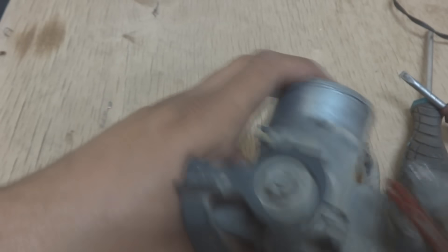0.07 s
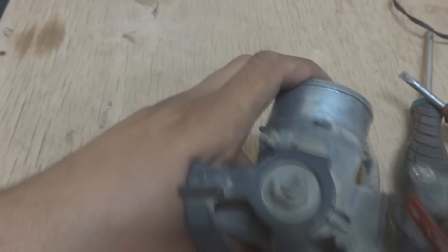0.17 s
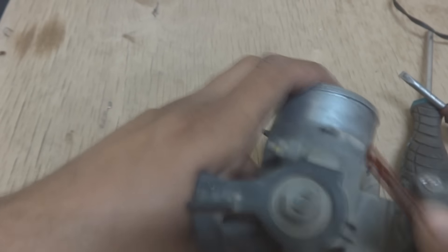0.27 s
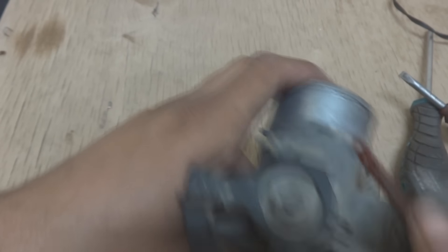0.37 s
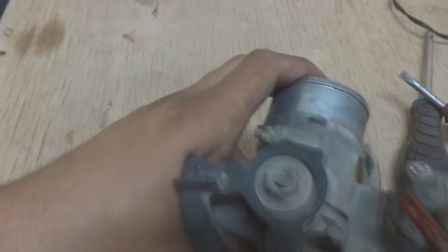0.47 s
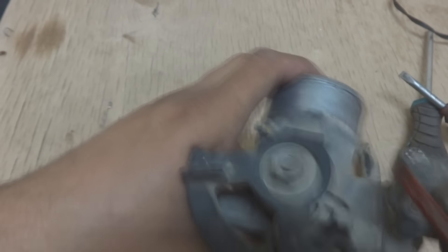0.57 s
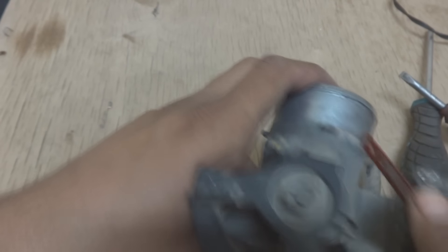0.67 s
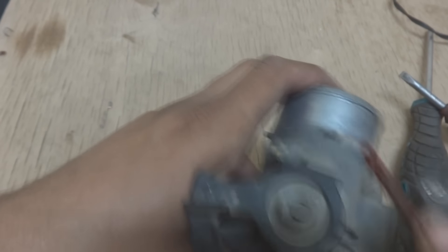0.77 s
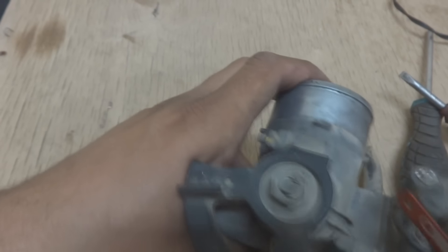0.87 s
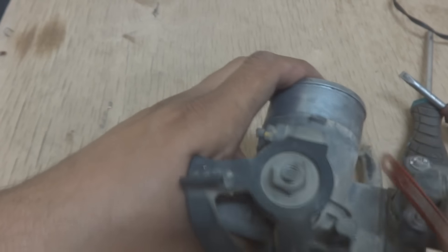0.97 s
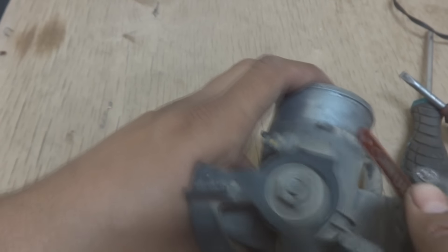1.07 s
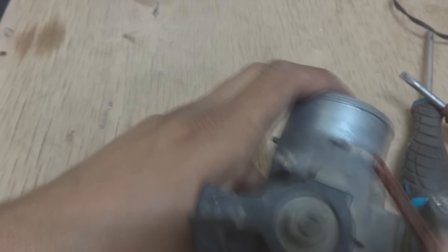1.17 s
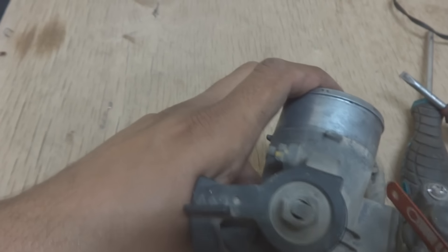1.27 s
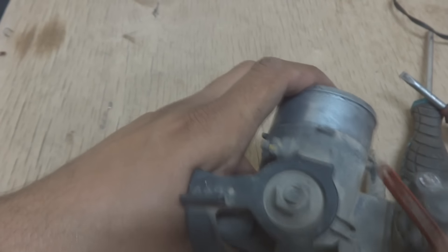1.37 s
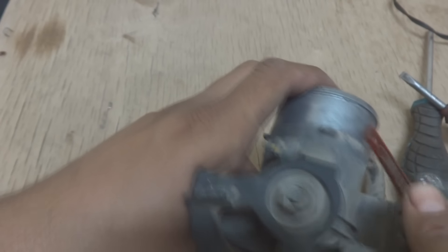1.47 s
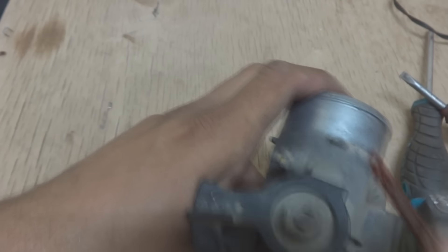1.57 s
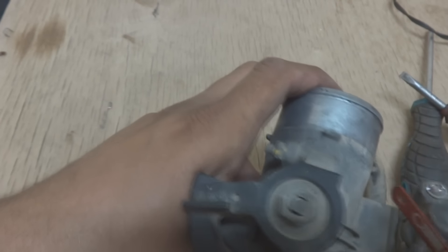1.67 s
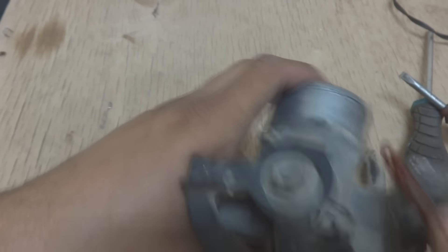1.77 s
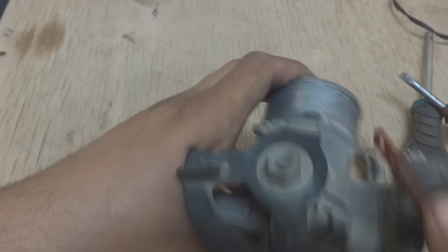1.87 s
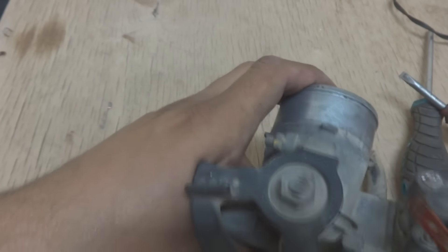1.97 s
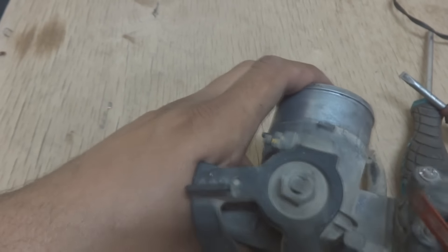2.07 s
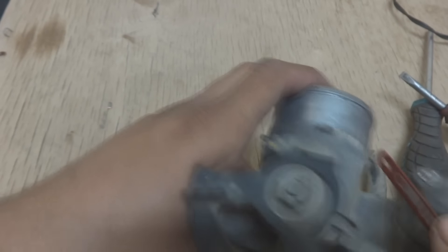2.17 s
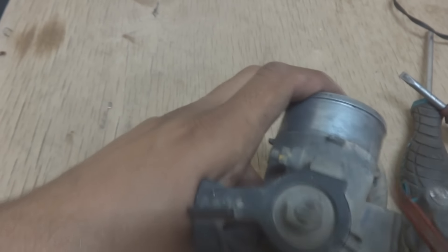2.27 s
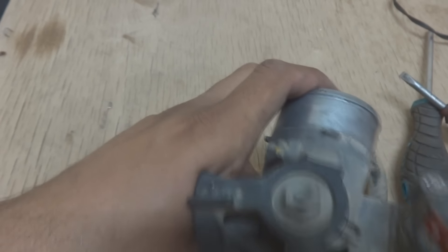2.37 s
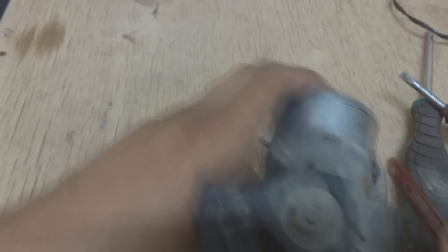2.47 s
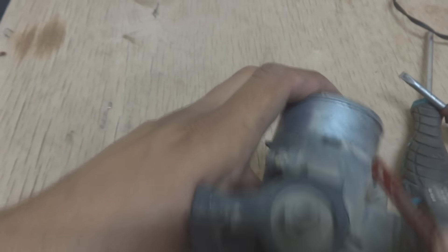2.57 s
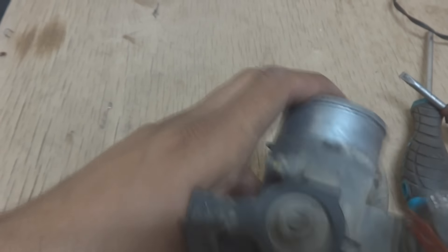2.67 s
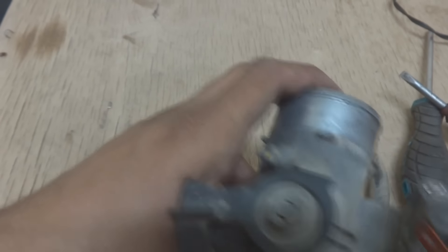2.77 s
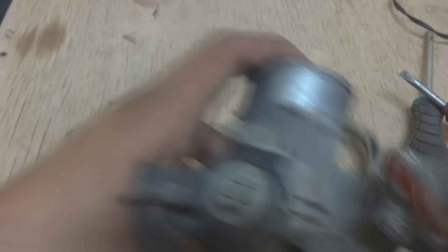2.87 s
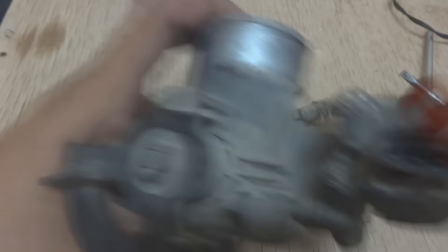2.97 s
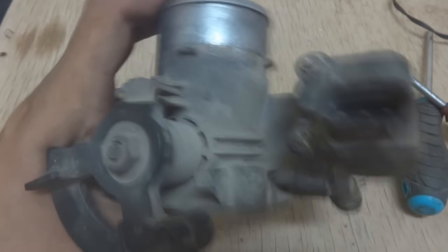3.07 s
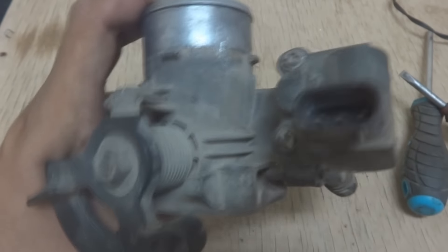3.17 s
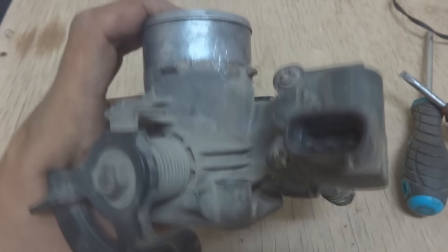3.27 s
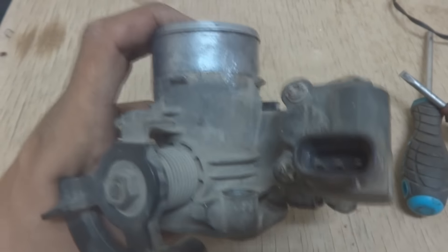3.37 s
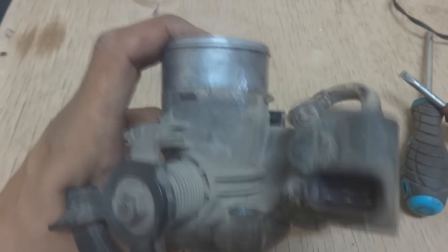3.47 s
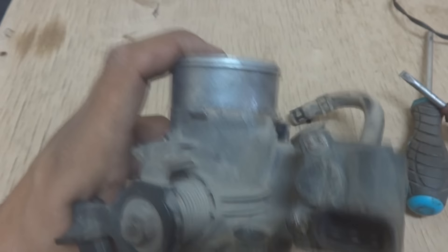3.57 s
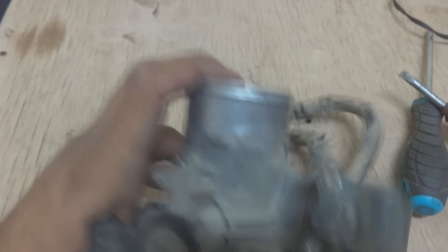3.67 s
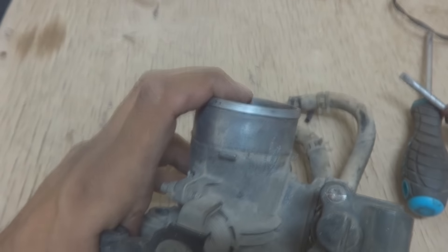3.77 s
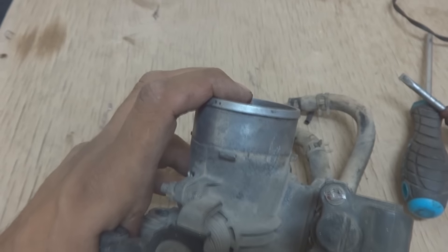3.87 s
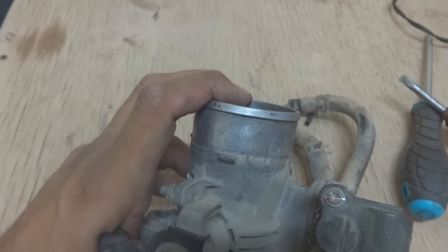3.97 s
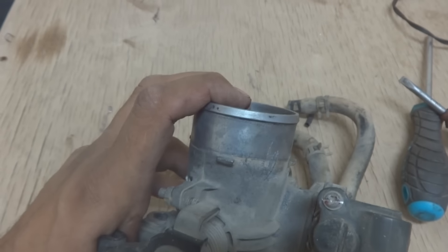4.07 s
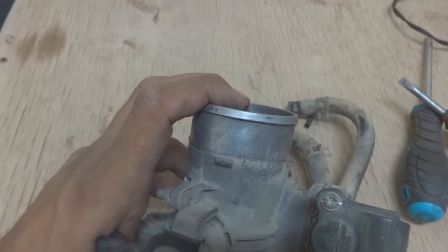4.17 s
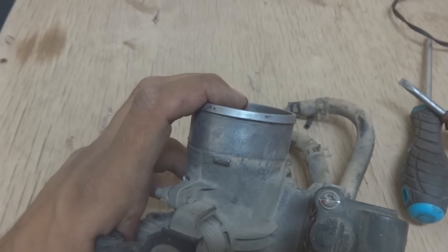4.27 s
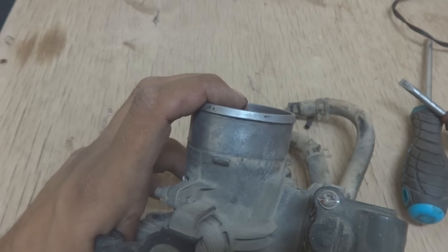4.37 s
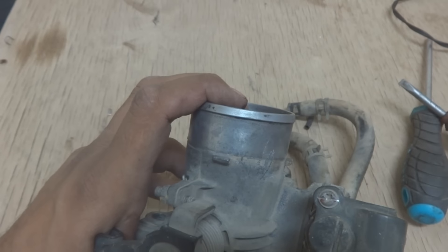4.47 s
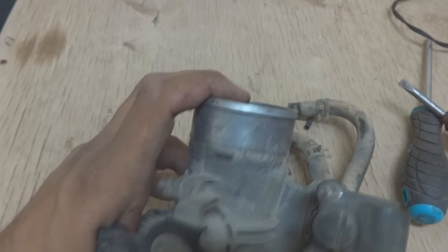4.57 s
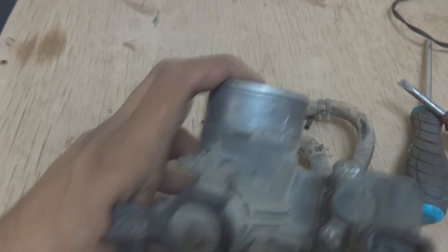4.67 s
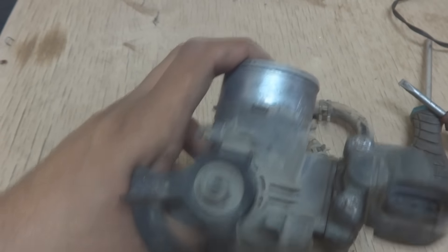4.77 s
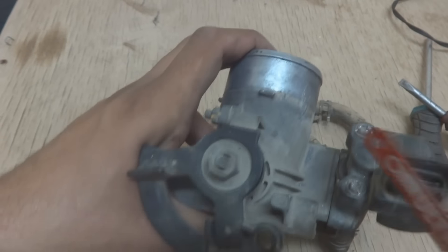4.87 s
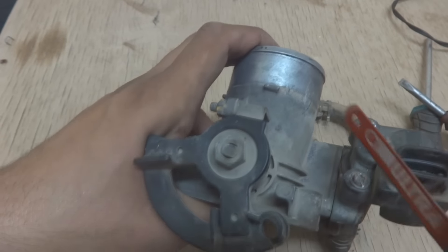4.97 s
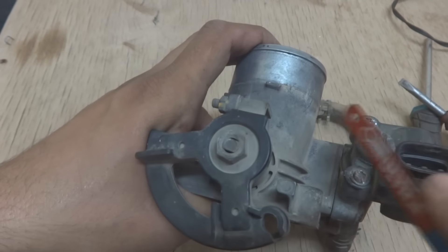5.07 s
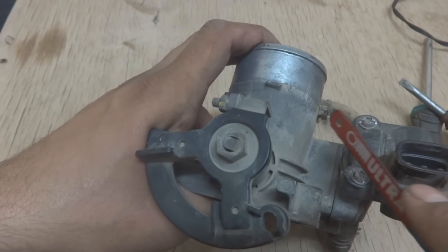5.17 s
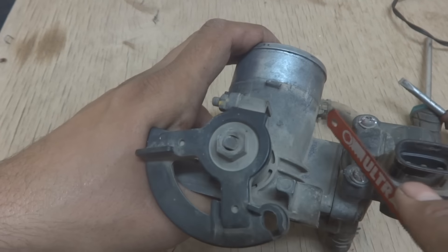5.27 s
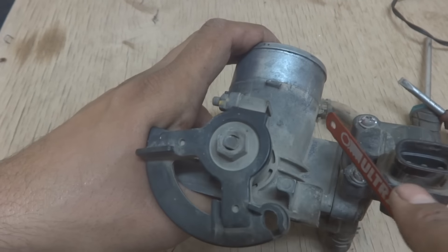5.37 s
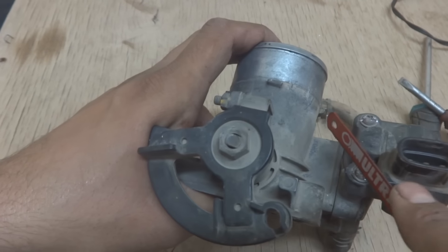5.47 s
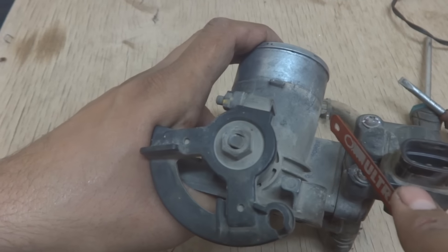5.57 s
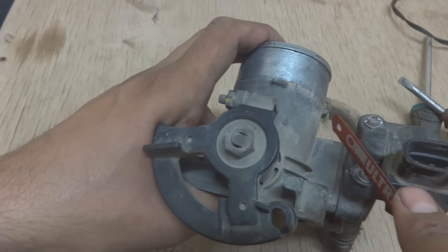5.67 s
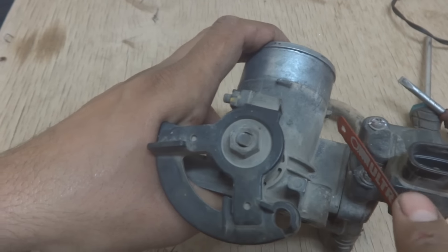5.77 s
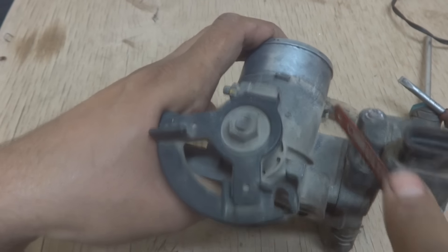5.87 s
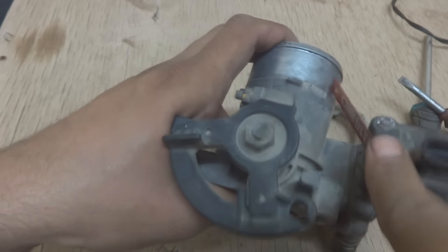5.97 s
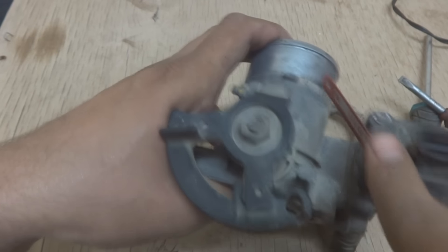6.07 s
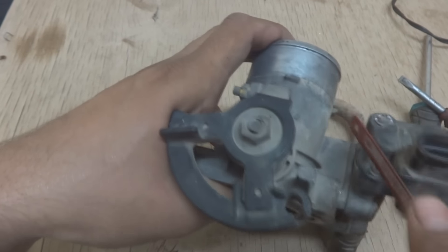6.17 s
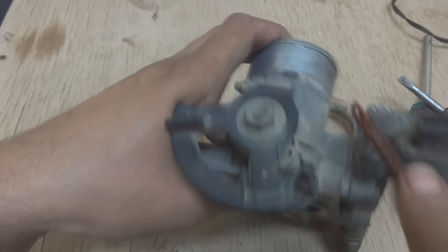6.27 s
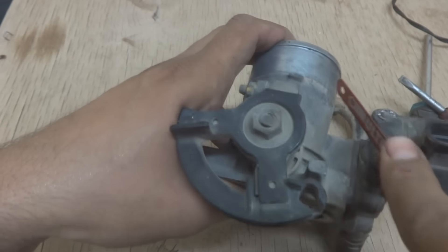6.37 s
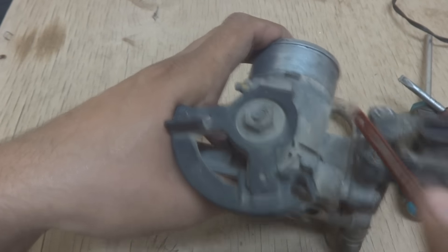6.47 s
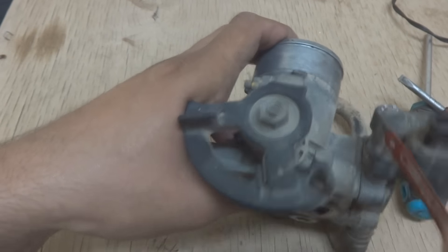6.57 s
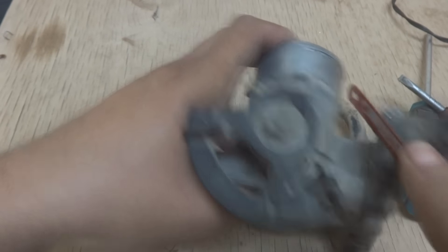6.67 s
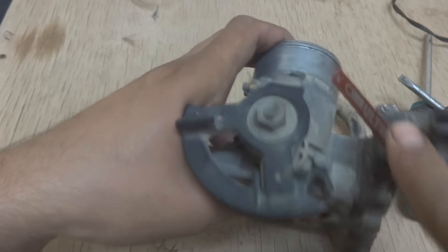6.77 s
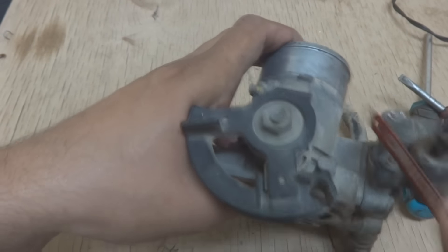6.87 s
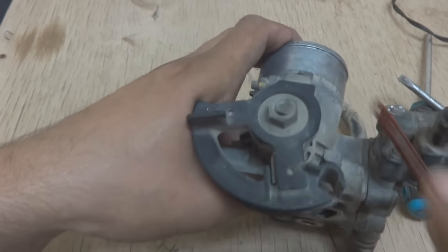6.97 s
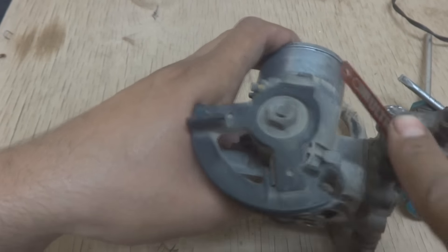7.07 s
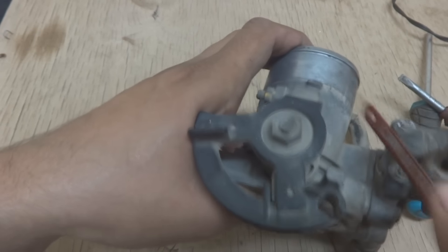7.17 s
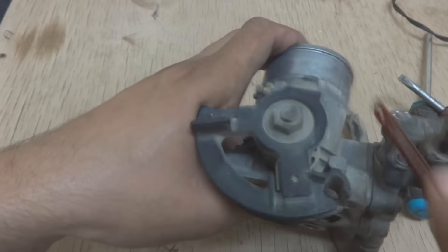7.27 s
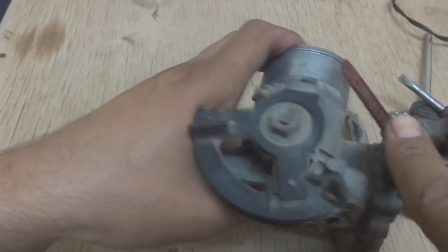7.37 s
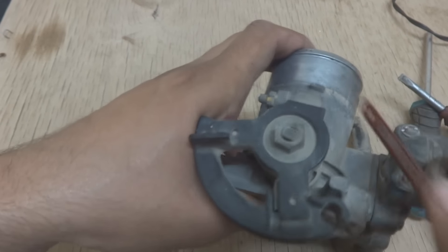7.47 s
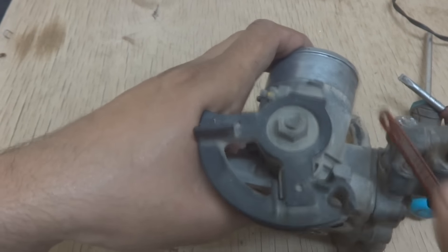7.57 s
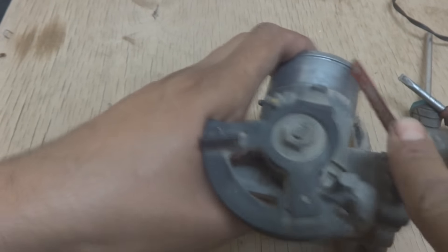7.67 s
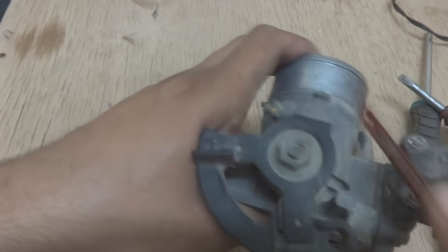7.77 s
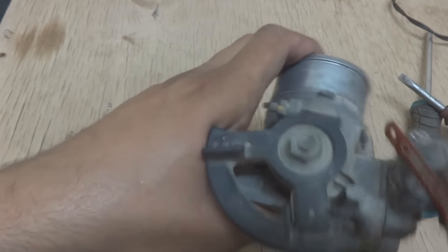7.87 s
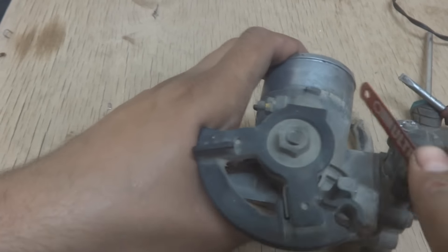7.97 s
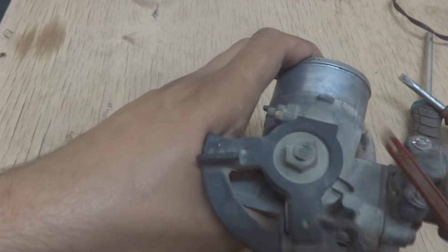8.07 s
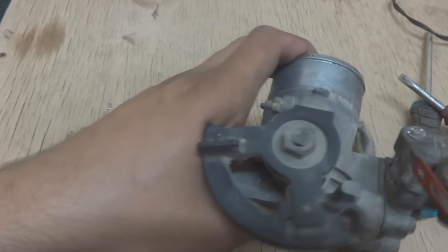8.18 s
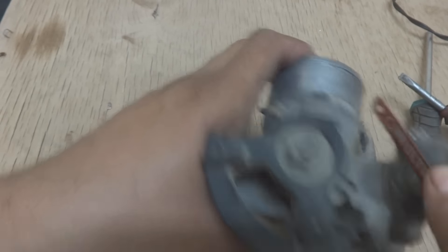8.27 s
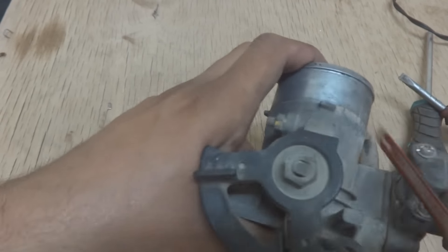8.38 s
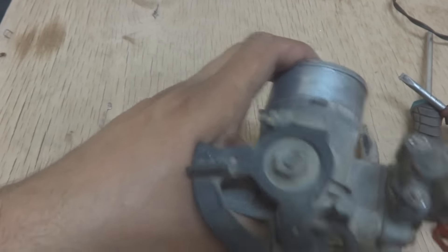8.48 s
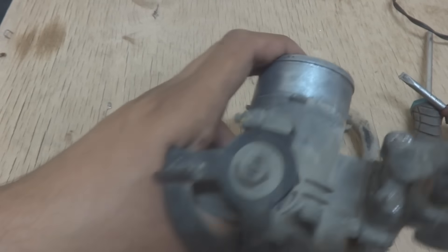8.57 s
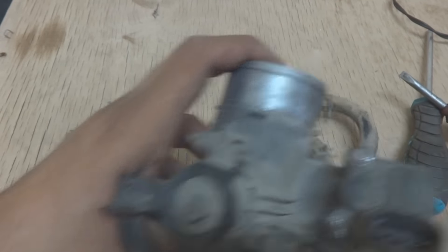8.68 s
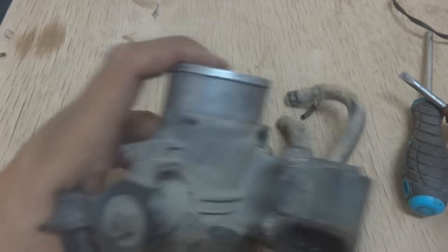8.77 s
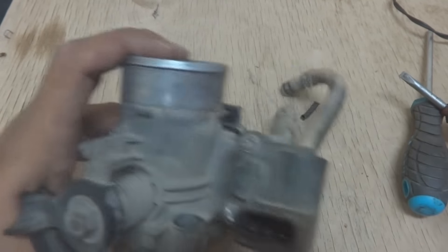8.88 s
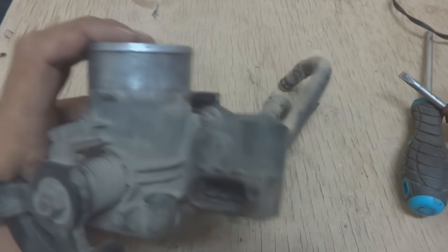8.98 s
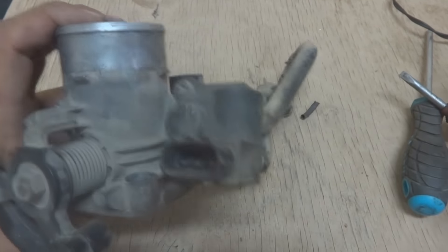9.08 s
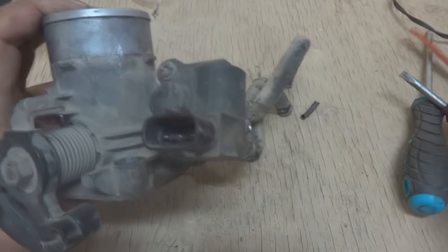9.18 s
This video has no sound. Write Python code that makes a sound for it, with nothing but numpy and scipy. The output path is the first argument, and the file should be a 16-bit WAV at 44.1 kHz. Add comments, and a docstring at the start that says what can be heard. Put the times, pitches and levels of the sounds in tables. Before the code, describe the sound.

Close up in a small room, a hacksaw blade scrapes back and forth on a metal screw, about five strokes a second, hissing and catching with bright clicks while the wooden bench faintly rumbles. The metal part is shifted and set down with a rattling knock. Only low room noise remains for about two seconds. Then the sawing resumes, and finally the part rubs briefly across the wood.

```python
"""A hand-held hacksaw cuts a slot in a screw on a throttle body, in two bouts of quick strokes.
The impacts of the teeth force the resonances of blade and casting; tearing chips hiss, and a snagged
tooth twangs the blade. The strokes also shake the wooden bench beneath, which rumbles and creaks.
Between the bouts the casting is lifted and set down; at the end it is dragged again.
A small, hard room adds short reverberation and a low, steady noise."""
import sys
import numpy as np
from scipy import signal
from scipy.fft import rfft, irfft
from scipy.io import wavfile
from scipy.ndimage import uniform_filter1d

SR = 44100
rng = np.random.default_rng(int(sys.argv[2]) if len(sys.argv) > 2 else 0)


def wrap_up_sound(samples):
    """Save the sound to the file named by the first command line argument, as 16-bit audio."""
    columns = np.atleast_2d(samples).T
    # keep every value between -1 and 1, then stretch to whole-number steps
    tamed = np.clip(columns, -1, 1)
    steps = np.round(tamed * 32767).astype(np.int16)
    wavfile.write(sys.argv[1], SR, steps)


N = 406161
TIME, FREQS = np.arange(N) / SR, np.fft.rfftfreq(N, 1 / SR)


def amp(db):
    """Amplitude ratio of a level in decibels."""
    return 10 ** (np.asarray(db) / 20)

def unit(x):
    """Normalisation to rms 1."""
    return x / np.sqrt(np.mean(x ** 2) + 1e-20)

def read(points, hz):
    """Interpolation on a log-frequency axis."""
    f, value = np.transpose(points)
    return np.interp(np.log(hz + 1), np.log(f + 1), value)

def add(mix, s, sound):
    """Superposition of a sound starting at s seconds."""
    part = mix[max(round(s * SR), 0):][:len(sound)]
    part += sound[:len(part)]

def noise(spectrum):
    """Stationary noise of a given spectrum, rms 1."""
    return unit(irfft(rfft(rng.standard_normal(N)) * amp(read(spectrum, FREQS)), N))

def wander(hz):
    """Random fluctuation, low-passed near hz, rms 1."""
    return unit(irfft(rfft(rng.standard_normal(N)) * np.exp(-(FREQS / hz) ** 2), N))

def response(spectrum, size=4096):
    """Minimum-phase impulse response of a spectrum, energy 1."""
    log_gain = np.log(amp(read(spectrum, abs(np.fft.fftfreq(size, 1 / SR)))))
    h = np.fft.ifft(np.exp(np.conj(signal.hilbert(log_gain)))).real
    return h / np.linalg.norm(h)

def ringing(modes, size=4096):
    """Impulse response of damped modes, energy 1."""
    t = np.arange(size) / SR
    h = sum(amp(db) * np.sqrt(width) * np.exp(-np.pi * width * t) * np.sin(2 * np.pi * hz * t) * (-1)**k
            for k, (hz, width, db) in enumerate(modes))
    return h / np.linalg.norm(h)

def through(x, h):
    """Convolution with an impulse response."""
    return signal.oaconvolve(x, h)[:N]

def resonate(x, hz, width):
    """Complex response of a resonator tuned along the curve hz."""
    turn, pole = np.exp(2j * np.pi * np.cumsum(hz) / SR), np.exp(-np.pi * width / SR)
    return turn * signal.lfilter([1 - pole], [1, -pole], x / turn)

def fade(start, end, db):
    """A soft-edged gate peaking at db."""
    progress = np.clip((TIME - start) / (end - start), 0, 1)
    return amp(db) * np.sqrt(np.clip(np.sin(np.pi * progress), 0, 1))

# The room's noise spectrum. Each row: frequency in Hz, level in dB.
FLOOR_SPECTRUM = [(15, -65), (25, -26.5), (141, -3.5), (161, -16.5), (249, -8), (270, -18), (335, -13),
                  (439, -25), (476, -16), (560, -25.5), (962, -26.5), (1190, -33.5), (5570, -41.5),
                  (16000, -48.5)]

def room_noise(db=-54):
    """Partial coherence: each channel has shared noise plus its own."""
    shared = noise(FLOOR_SPECTRUM)
    separate = np.array([noise(FLOOR_SPECTRUM), noise(FLOOR_SPECTRUM)])
    return amp(db) * unit(shared + 1.4 * separate)

# Reverberation time. Each row: frequency in Hz, T60 in seconds.
ROOM_T60 = [(100, 0.76), (250, 0.26), (600, 0.51), (1400, 0.33), (3700, 0.3), (9000, 0.24), (16000, 0.1)]
# Stereo width. Each row: frequency in Hz, ratio of unshared to shared reflections.
ROOM_SPREAD = [(150, .25), (600, 0.29), (1200, 0.77), (3000, 0.78), (9000, 1)]

def room(x, wet_db, gap_s=0.0022, size=24000):
    """Reverberation: each band decays at its own rate; two close microphones share most reflections."""
    taps = rng.standard_normal((3, size)) * (rng.random((3, size)) < .12)
    hz, t, bands = signal.stft(taps * (np.arange(size) > gap_s * SR), SR, nperseg=256)
    spread = read(ROOM_SPREAD, hz)[:, None]
    bands = (bands[:1] + spread * bands[1:]) / np.hypot(1, spread)
    tail = signal.istft(bands * amp(-60 * t / read(ROOM_T60, hz)[:, None]), SR, nperseg=256)[1]
    return x + amp(wet_db) * signal.fftconvolve(x[None], tail / np.linalg.norm(tail[0]), axes=1)[:, :N]

# The hand shifts its grip. Each row: start and end in seconds, level in dB.
GRIPS = [(2.933, 3.173, -44.5), (3.16, 3.446, -63.5), (3.747, 3.904, -45.5), (4.78, 5.077, -64.5),
         (8.615, 8.808, -45.5), (8.755, 8.964, -52.5), (8.942, 9.086, -49.5)]
# Skin on metal. Each row: frequency in Hz, level in dB.
SKIN_SPECTRUM = [(500, 9), (1400, 3.5), (3000, -1), (6000, -6.5), (15000, -40)]

def gripping():
    """Friction noise: skin rustles unevenly on the metal."""
    rustle = unit(noise(SKIN_SPECTRUM) * amp(2 * wander(80) + 3.3 * wander(16)))
    return sum(fade(*row) for row in GRIPS) * rustle

def drag_envelope(column):
    """Amplitude envelope from one level column of both drags."""
    curves = [np.transpose(rows) for rows in DRAGS]
    return sum(amp(np.interp(TIME, c[0], c[column], left=-120, right=-120)) for c in curves)

# Two drags of the casting, a list each. Each row: time in seconds, groan and rub levels in dB.
DRAGS = [
    [(2.87, -47, -47), (2.908, -69, -59), (2.952, -39.5, -43), (3.016, -33, -50), (3.02, -32, -43),
     (3.136, -48, -34.5), (3.14, -54, -51), (3.2, -65, -56)],
    [(8.63, -32, -62), (8.702, -63, -43), (8.764, -39, -40), (8.884, -35.5, -48), (8.964, -40, -44),
     (8.988, -28, -44), (9.126, -50, -60), (9.2, -59, -43)],
]
# The groan's resonance. Its row: frequency and bandwidth in Hz, level in dB.
GROAN_MODE = [(325, 11, 0)]
# Metal rubbing on wood. Each row: frequency in Hz, level in dB.
RUB_SPECTRUM = [(250, -20.5), (550, 12.5), (950, -9), (1200, -7.5), (1450, 1), (1900, -14), (3000, -36)]

def dragging(slip_db=3, slip_hz=45):
    """Stick-slip friction: the casting groans and rubs over the wood."""
    resonance = unit(through(rng.standard_normal(N), ringing(GROAN_MODE)))
    groan = unit(np.tanh(resonance / 1.6) * amp(slip_db * wander(slip_hz)))
    return amp(-0.5) * drag_envelope(1) * groan + amp(-6) * drag_envelope(2) * noise(RUB_SPECTRUM)

def load(start, length, rise, release):
    """First-order lag: the bench takes up a push, then relaxes."""
    t = np.arange(0, length + 5 * release, 1 / SR)
    envelope = (1 - np.exp(-t / rise)) * np.exp(-np.maximum(t - length, 0) / release)
    return envelope[max(round(-start * SR), 0):]

# The bench's sway and creak. Each row: frequency in Hz, level in dB.
SWAY_SPECTRUM = [(20, -23), (45, -14), (66, 9.5), (85, -0.5), (110, -7), (170, -45.5)]
CREAK_SPECTRUM = [(70, -42), (115, -6), (145, -1.5), (180, 2), (210, -5.5), (260, -0.5), (400, -1.5),
                  (700, -39)]

def bench(idle_sway_db=-52, idle_creak_db=-46):
    """Forced vibration: strokes sway the bench; strokes, clacks and drags make it creak."""
    sway, creak = np.zeros((2, N))
    for start, length, _, _, force_db, *_, sway_db in STROKES:
        add(sway, start, amp(sway_db - 2.5) * load(start, length, rise=0.035, release=0.031))
        add(creak, start, amp(0.43 * force_db - 24.5) * load(start, length, rise=0.015, release=0.027))
    for s, *_ in CLACKS:
        add(creak, s, amp(-39) * load(s, length=0.02, rise=0.01, release=0.027))
    leaning = sum(fade(start, end, 0) for start, end in BOUTS)
    sway = np.hypot(sway, amp(idle_sway_db) * leaning)
    creak = np.hypot(creak, amp(idle_creak_db) * leaning) + amp(-9) * drag_envelope(1)
    return sway * unit(np.tanh(noise(SWAY_SPECTRUM) / 2)) + creak * noise(CREAK_SPECTRUM)

def spring(set_down_s=3.862, hz=1420, width_hz=240, db=-50, t60=1.0):
    """Free decay: close modes, likely the throttle spring's, ring on after the set-down."""
    coil = unit(through(rng.standard_normal(N), ringing([(hz, width_hz, 0)])))
    return coil * (TIME > set_down_s) * amp(db - 60 * np.maximum(TIME - set_down_s, 0) / t60)

# The casting strikes the bench. Each row: time in seconds, level in dB, hardness as a cut-off in Hz.
KNOCKS = [(3.802, -19, 121), (3.841, -10, 1400), (3.853, -11, 1900), (3.862, -9, 2200),
          (3.869, -12.5, 1200), (3.882, -8.5, 400), (3.901, -12.5, 450), (3.934, -22, 700),
          (4.019, -25.5, 160), (.797, -19.5, 250), (1.935, -22.5, 250), (3.003, -24.5, 249),
          (8.023, -18.5, 500.7), (8.973, -16, 197), (9.018, -20, 200)]
# Modes of the bench top. Each row: frequency in Hz, level in dB, T60 in seconds.
BENCH_MODES = [(144.54, -7.5, 0.26), (167.93, 4.5, 0.1), (194.9, -3, 0.17), (233.5, -8.5, 0.12),
               (322, -2.5, 0.12), (405, -2, 0.084), (522.2, -8, 0.071), (709.5, -5, 0.1),
               (944, -8.5, 0.086)]
# The casting's loose parts. Each row: frequency in Hz, level in dB.
RATTLE_SPECTRUM = [(20, -37), (60, -9), (120, -10), (330, 3), (600, 1.5), (1200, -6), (2200, -16),
                   (4000, -23.5), (7000, -26), (15000, -39)]

def knocks(rattle_db=-9, rattle_decay_s=0.017, size=16000):
    """Impact excitation: blows ring the bench top; harder ones pass more of the casting's rattle."""
    out, t = np.zeros(N), np.arange(size) / SR
    wood = sum(amp(db - 60 * t / t60) * np.sin(2 * np.pi * hz * t) for hz, db, t60 in BENCH_MODES)
    for s, db, cutoff_hz in KNOCKS:
        burst = rng.standard_normal(size) * np.exp(-t / rattle_decay_s)
        blow = wood / abs(wood).max() + amp(rattle_db) * through(burst, response(RATTLE_SPECTRUM))[:size]
        add(out, s, amp(db) * signal.lfilter(*signal.butter(1, cutoff_hz, fs=SR), blow))
    return signal.lfilter(*signal.butter(2, 80, "high", fs=SR), out)  # the top radiates little deep bass

# Smooth steel slides. Each row: start and end in seconds, pitch and bandwidth in Hz, level in dB.
SQUEAKS = [(1.239, 1.319, 6250, 349.8, -49), (3.082, 3.142, 9400, 520, -38.5),
           (3.122, 3.13, 2950, 150, -39), (6.166, 6.189, 6080, 222, -34.5), (7.76, 7.772, 8000, 400, -33),
           (9.14, 9.26, 4018, 452, -44)]

def squeaks():
    """Frictional excitation: uneven rubbing feeds one resonance per squeak."""
    friction = unit(amp(3.3 * wander(110)) * rng.standard_normal(N))
    return sum(through(friction * fade(start, end, db), ringing([(hz, width, 0)]))
               for start, end, hz, width, db in SQUEAKS)

# Light touches of metal on metal. Each row: time in seconds, level in dB.
TICKS = [(0.11, -41), (.506, -36), (.803, -33), (1.066, -40), (1.859, -40), (1.877, -29.5), (1.933, -36.5),
         (3.001, -33), (5.275, -48.5), (5.661, -48.5), (7.091, -30), (7.226, -39), (7.249, -35),
         (8.152, -40), (8.357, -25.5), (8.932, -36.5)]

def ticks(decay_s=0.0028, size=800):
    """Transient excitation: the blade tip's brief scratches sound blade and casting."""
    touch, t = np.zeros(N), np.arange(size) / SR
    for s, db in TICKS:
        add(touch, s, amp(db) * rng.standard_normal(size) * np.exp(-t / decay_s))
    scratch = amp(-4) * response(HISS_SPECTRUM) + amp(-6) * response(RASP_SPECTRUM)
    metal = amp(-29.5) * ringing(BLADE_TOP_MODES) + amp(-7.5) * response(CASTING_SPECTRUM)
    return through(touch, scratch + metal)

# The casting rocks as the saw reverses. Each row: time in seconds, level in dB, pitch in Hz.
CLACKS = [(0.115, -30, 680), (.833, -23, 604), (1.068, -23, 660.5), (1.574, -9, 603), (1.632, -36, 650.4),
          (1.859, -19.5, 620), (1.884, -16.5, 627), (1.934, -18, 668), (2.675, -24.5, 650),
          (2.711, -18.5, 483), (6.695, -31, 657), (7.189, -17.5, 663.4), (7.494, -22, 480),
          (7.773, -14, 690), (8.024, -32, 602), (8.133, -20.5, 663.6), (8.441, -14.5, 800)]
# The casting's resonances. Each row: frequency and bandwidth in Hz, level in dB.
CASTING_MODES = [(677, 41, 11), (613, 90, -6.5), (769, 70, -9), (977, 81.3, 8), (1231, 28, -1),
                 (1695, 198.6, -34.5)]
# Its broadband response. Each row: frequency in Hz, level in dB.
CASTING_SPECTRUM = [(120, -33), (260, -8.5), (430, 0.5), (700, 0.5), (980, 4.5), (1150, -5), (1450, -17),
                    (2200, -15), (2900, -25), (4200, -38)]

def clacks(decay_s=0.0075, body_decay_s=0.0031, size=4000):
    """Damped vibration: one strong mode outlasts the casting's others in a hollow knock."""
    out, t = np.zeros(N), np.arange(size) / SR
    casting = ringing(CASTING_MODES) + response(CASTING_SPECTRUM)
    for s, db, hz in CLACKS:
        body = through(rng.standard_normal(size) * np.exp(-t / body_decay_s), casting)[:size]
        mode = 0.52 * np.sin(2 * np.pi * hz * t) * np.exp(-t / decay_s)
        add(out, s, amp(db) * (mode + amp(-3) * body / abs(body).max()))
    return out

# A tooth catches hard. Each row: time in seconds, level in dB, pitch in Hz, relative overtones in dB.
SNAGS = [(.161, -8, 2570, -25), (.375, -21, 2580, -8), (.41, -8.5, 2614, -4.5), (.546, -9.5, 2570, -20),
         (1.172, -14, 3050, -2), (1.320, -13, 2400, -21), (1.345, -14, 2480, -32), (1.574, -10, 2915, -0.5),
         (1.721, -14.5, 2565, -17), (1.735, -7, 2600, -16), (2.412, -16.5, 2440, -24),
         (2.424, -19, 2523, -14), (2.592, -18, 2613, 0.5), (6.087, -22.5, 3394, -0.5),
         (6.111, -21, 3310, -8), (6.237, -27, 3090, 2.5), (6.28, -20, 3045, -15), (6.438, -21.5, 2600, -13),
         (6.783, -14, 3340, -18), (6.934, -19, 2400, -19), (6.977, -19.5, 2390, -26),
         (7.005, -15.5, 2399, -9), (7.114, -16.5, 3430, -21), (7.127, -15, 3430, -26),
         (7.267, -15.5, 2600, -7.5), (7.307, -17, 2300, -21), (7.320, -15.5, 2354, -24),
         (7.473, -30, 2267, 11.5), (7.574, -15.5, 2370, -24), (7.632, -13, 2380, -20),
         (7.780, -6.5, 3146, -8), (7.796, -9.5, 2740, -10), (7.887, -16, 2270, -21),
         (7.947, -17, 2460, -18), (8.224, -19, 3054, -26), (8.371, -12.5, 3318, -16),
         (8.381, -6.5, 3368, -21)]
# The crack of its release. Each row: frequency in Hz, level in dB.
CRACK_SPECTRUM = [(150, -38.5), (600, 12), (1100, 11), (1800, -0.5), (2600, 2.5), (3400, -0.5), (4500, -12),
                  (6200, 2), (9000, -9), (12000, -7.5), (16000, -39)]

def snags(rise_s=0.00017, decay_s=0.003, crack_decay_s=0.0019, waver=0.07, size=1500):
    """Elastic release: a tooth cracks free and the blade twangs, with overtones where it rubs."""
    twangs, cracks, t = np.zeros(N), np.zeros(N), np.arange(size) / SR
    envelope = (1 - np.exp(-t / rise_s)) * np.exp(-t / decay_s)
    for s, db, hz, overtone_db in SNAGS:
        jitter, chips = rng.standard_normal((2, size))
        phase = 2 * np.pi * np.cumsum(hz * (1 + waver * unit(uniform_filter1d(jitter, size=30)))) / SR
        overtones = np.sin(2 * phase) + 0.3 * np.sin(3 * phase) + 0.27 * np.sin(4 * phase)
        add(twangs, s, amp(db - 2) * (np.sin(phase) + amp(overtone_db) * overtones) * envelope)
        add(cracks, s, amp(db - 5) * chips * np.exp(-t / crack_decay_s))
    return twangs + through(cracks, response(CRACK_SPECTRUM))

def sticking(depth=0.61, half_lead_s=0.0053):
    """Static friction: the blade is held just before each snag, so the gain dips."""
    held = np.zeros(N)
    for s, *_ in SNAGS:
        add(held, s - 2 * half_lead_s, np.hanning(int(1.8 * half_lead_s * SR)))
    return 1 - np.clip(depth * held, 0, .9)

def catches(per_s=22, decay_s=0.0043, size=1000):
    """A Poisson process: teeth catch lightly at random, each a brief surge of force."""
    surges = (rng.random(N) < per_s / SR) * amp(6 + 1.5 * np.clip(rng.standard_normal(N), -2, 1))
    return 1 + through(surges, np.exp(-np.arange(size) / SR / decay_s))

def sliding(x, wide_db, fine_db):
    """A moving contact point favours changing resonances, modelled as random patches of spectral gain."""
    bands = signal.stft(x, SR, nperseg=512, noverlap=384)[2]
    wide, fine = rng.standard_normal((2, *bands.shape))
    wide = uniform_filter1d(uniform_filter1d(wide, size=9, axis=0), size=8, axis=1)
    fine = uniform_filter1d(uniform_filter1d(fine, size=2, axis=0), size=16, axis=1)
    patches = unit(amp(wide_db * np.clip(unit(wide), -2, 2) + fine_db * np.clip(unit(fine), -2, 2)))
    return signal.istft(bands * patches, SR, nperseg=512, noverlap=384)[1][:N]

def honk(cut, speed, hz, glide=0.035, width_hz=90):
    """Lock-in: the teeth drive one resonance that rises with speed; friction limits its swing."""
    swing = resonate(cut, hz * (1 + glide * (speed - .8) + 0.02 * wander(13)), width_hz)
    return np.sqrt(np.clip(speed, 0, 1)) * unit((swing / np.sqrt(abs(swing) + 1e-9)).real)

# The blade's low resonance. Each row: time in seconds, frequency in Hz.
BLADE_PITCH = [(0, 2350), (1.5, 2400), (2.7, 2456), (6.4, 2497), (7.0, 2420), (7.9, 2240), (8.3, 2530)]

def blade_ring(cut, width_hz=150):
    """Bending resonance: the free length between fingers and screw sets the pitch."""
    hz = np.interp(TIME, *np.transpose(BLADE_PITCH)) * (1 + 0.024 * wander(25))
    return unit(resonate(cut, hz, width_hz).real)

def teeth(speed, slow_hz=380, gain_hz=650, chatter_hz=165, chatter_db=4):
    """Amplitude modulation: the bouncing blade varies the tooth impacts and the noise of torn chips."""
    bounce = np.cos(2 * np.pi * np.cumsum(chatter_hz * (1 + .25 * wander(69.6))) / SR)
    pressure = amp(chatter_db * bounce + 2.47 * np.clip(wander(73), -1.5, 1.5))
    tooth_hz = (slow_hz + gain_hz * speed) * (1 + .2 * wander(400))
    clicks = np.diff(np.floor(np.cumsum(tooth_hz) / SR), prepend=0)
    impacts = unit(clicks * amp(4 * np.clip(rng.standard_normal(N), -2, 1.5)))
    cut = unit(pressure * (impacts + amp(-3) * rng.standard_normal(N)))
    chips = unit(np.sqrt(pressure) * (impacts + amp(11.5) * rng.standard_normal(N)))
    return cut, chips

# Saw strokes. Each row: start and length in seconds, place of the hardest bite from 0 to 1, swell and
# peak force in dB, ring and brightness in dB relative to the force, honk in Hz, bench sway in dB.
STROKES = [(-.03, 0.06, 0.66, 2.5, -24, 1, -6.5, 581.4, -42),
           (.158, 0.081, 0.031, 16.3, -23, -1, -7, 630, -34.5),
           (.345, .095, 0.4, 15.4, -20.5, -5, -6.5, 590, -35.5),
           (.522, 0.08, 0.23, 7, -20.5, -3.5, -11.5, 586, -54),
           (.715, 0.097, 0.48, 14, -24, -6, -8, 592, -41),
           (.92, 0.077, 0.26, 5.5, -23.5, -2.5, -10.5, 648, -56),
           (1.092, 0.1, 0.87, 13.7, -25, -9.5, -8, 1000, -32),
           (1.319, 0.055, 0.36, 3.2, -29.5, 1, -12, 661, -40.5),
           (1.512, 0.088, .89, 9.9, -26.5, -12, -15, 597, -34),
           (1.665, .132, 0.94, 8, -26.5, -0.5, -14, 640, -44),
           (2.048, 0.089, 0.23, 5.8, -32, -13, -8, 648, -57),
           (2.196, 0.08, 0.89, 10.5, -26.5, -8.5, -7.5, 602, -35),
           (2.375, 0.091, 0.63, 18.7, -21, -3, -10.5, 640, -42),
           (2.565, 0.077, 0.37, 17, -18, -11, -10, 650, -36),
           (2.748, 0.094, 0.33, 4.7, -27, -10.5, -10, 820, -34),
           (6.038, 0.078, 0.85, 9, -33, -4, -5.5, 789, -42),
           (6.228, 0.093, 0.45, 3.1, -29, -6, -12, 660, -38),
           (6.43, 0.07, .47, 5.56, -28.5, -16, -11.5, 639, -37),
           (6.553, 0.12, 0.36, 13, -28.5, -10, -7, 484, -42),
           (6.762, 0.081, 0.41, 6.6, -25, -5, -4, 722, -51),
           (6.945, .095, 0.71, 12.1, -26, -5.5, -7, 703, -38),
           (7.105, 0.075, 0.49, 6.2, -20.5, -11.5, -10, 597, -33),
           (7.25, 0.1, 0.97, 7.5, -29, 0.5, -10, 685, -40),
           (7.413, 0.068, .87, 11.9, -20, -12, -8, 623, -29.5),
           (7.545, 0.12, 0.73, 9.7, -26, 0.5, -10.5, 690, -35),
           (7.718, 0.091, .8, 11.2, -23, -3.5, -4, 636, -55),
           (7.842, 0.12, 0.45, 3, -28.5, -0.5, -7.5, 690, -43),
           (8.062, .048, 0.18, 4.9, -24.5, -16.5, -11.5, 660, -49),
           (8.172, .1, 0.53, 15.8, -23, -1, -8, 631, -42),
           (8.368, 0.065, 0.29, 10.4, -19.5, -9, -6, 718, -37),
           (8.485, 0.13, 0.27, 6.7, -23.5, -13, -11, 611, -40.5)]

def strokes(attack_s=0.0056, release_s=0.0045, curve=1.36):
    """Reciprocating motion: speed follows a half sine, while force peaks at the hardest bite."""
    speed, honk_hz, forces = np.zeros(N), np.zeros(N), np.zeros((5, N))
    for start, length, bite, swell_db, force_db, ring_db, bright_db, hz, _ in STROKES:
        near = slice(max(int((start - .02) * SR), 0), int((start + length + .08) * SR))
        t = TIME[near] - start
        contact = np.clip(t / attack_s + 1, 0, 1) * np.exp(-np.maximum(t - length, 0) / release_s)
        from_bite = abs(np.interp(t / length, [0, bite, 1], [-1, 0, 1]))
        # shares of casting, low ring, high ring, hiss and rasp
        shares = amp([0, ring_db, bright_db - 0.6, bright_db + 0.54, 0.94 * ring_db - 5])
        forces[:, near] += shares[:, None] * contact * amp(force_db - swell_db * from_bite ** curve)
        speed[near] += np.sin(np.pi * np.clip(t / length, 0, 1))
        honk_hz[near.start:] = hz
    return speed, honk_hz, forces

# The blade stays in the slot. Each row: start and end in seconds.
BOUTS = [(-.5, 3.2), (6.03, 8.64)]
# The blade's upper resonances. Each row: frequency and bandwidth in Hz, level in dB.
BLADE_HIGH_MODES = [(3310, 440, 8.5), (3178, 79, 5.5), (3423, 170, -8.5)]
BLADE_TOP_MODES = [(5875, 390, 1.5), (6150, 280, 3), (7020, 40, -4), (8240, 112, 7), (9440, 56, -22.5),
                   (11230, 190, -13), (14700, 406, 0)]
# The teeth's dry rasp and the chips' hiss. Each row: frequency in Hz, level in dB.
RASP_SPECTRUM = [(900, -17), (1230, 5), (1450, -3.5), (1680, 2.5), (1950, -1), (2200, -4.5), (2900, -3),
                 (4200, -35.5)]
HISS_SPECTRUM = [(1500, -28), (3000, 9), (3900, 0.5), (4500, 1), (5200, -3), (6100, 6), (6700, -6),
                 (8000, 2), (9500, -7.5), (12500, -7), (16000, -21.5)]

def sawing(skim_db=-50):
    """Source and filter: tooth impacts and tearing chips drive the resonances of casting and blade."""
    speed, honk_hz, forces = strokes()
    push, low, high, hiss, rasp = forces * sticking()
    low, high, rasp = np.array([low, high, rasp]) * catches()
    cut, chips = teeth(speed)
    push += sum(fade(start, end, skim_db) for start, end in BOUTS)  # the returning blade only skims
    body = through(cut * push, amp(-3) * response(CASTING_SPECTRUM) + amp(-10) * ringing(CASTING_MODES))
    honking = amp(-7.5) * push * honk(cut, speed, honk_hz)
    blade = amp(-7) * low * blade_ring(cut)
    blade += through(cut * high, amp(-4) * ringing(BLADE_HIGH_MODES))
    blade += through(cut * rasp, amp(-0.5) * response(RASP_SPECTRUM))
    fizz = through(chips * hiss, amp(-2.5) * response(HISS_SPECTRUM))
    fizz += through(cut * hiss, amp(-10) * ringing(BLADE_TOP_MODES))
    fizz = sliding(fizz, wide_db=3, fine_db=2.3)
    return sliding(body + blade, wide_db=0.9, fine_db=5.5) + honking + fizz

def scene():
    """Superposition: saw, knocks and bench reverberate over the room's steady noise."""
    floor = room_noise()
    saw = room(sawing() + snags() + clacks() + ticks() + squeaks(), wet_db=-12)
    blows = room(knocks() + spring(), wet_db=-6.5)
    rumble = room(bench() + dragging() + gripping(), wet_db=-11)
    return saw + blows + rumble + floor

# Stereo balance. Each row: frequency in Hz, left minus right in dB.
BALANCE_DB = [(40, -1.5), (140, 1), (500, 2.5), (1500, 1.6), (4000, -0.7), (9000, -3), (15000, -1.5)]

def record(dry, ceiling=0.36, edge_hz=16200):
    """Filtering and saturation: mids lean left, treble right; peaks are rounded, then the band limited."""
    lean_db = read(BALANCE_DB, FREQS) / 2
    heard = irfft(rfft(dry) * amp([lean_db, -lean_db]), N)
    heard = heard / (1 + (heard / ceiling) ** 4) ** (1 / 4)
    lowpass = signal.firwin(511, edge_hz, window=("kaiser", 9), fs=SR)
    return signal.oaconvolve(heard, lowpass[None], "same")

dry = scene()
out = record(dry)
wrap_up_sound(out)
```